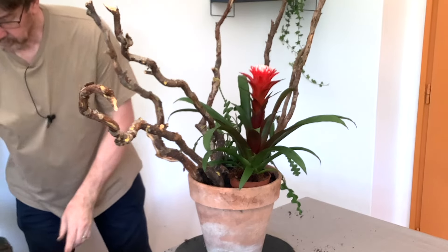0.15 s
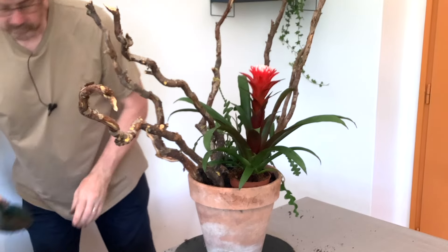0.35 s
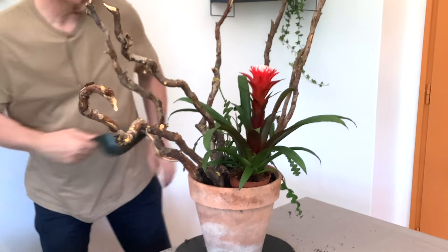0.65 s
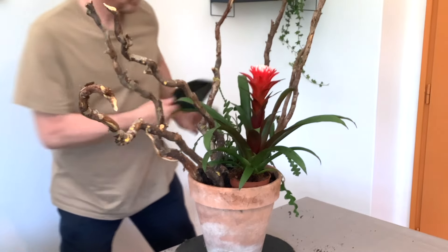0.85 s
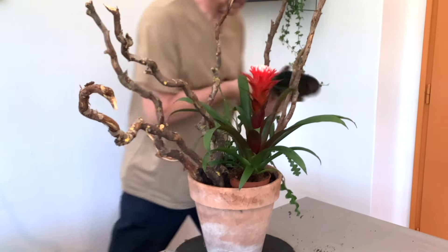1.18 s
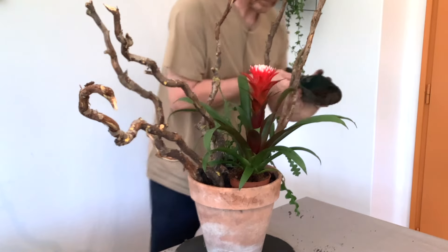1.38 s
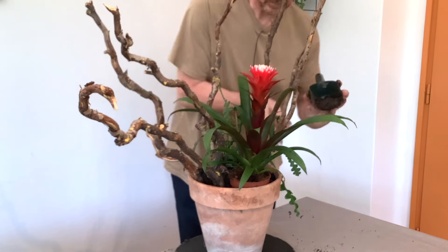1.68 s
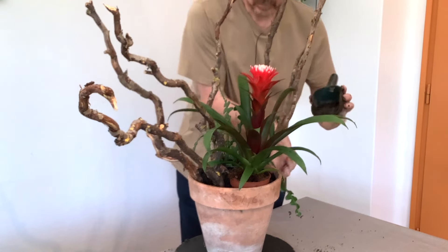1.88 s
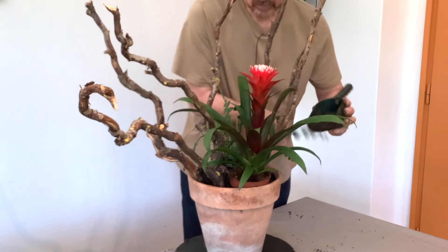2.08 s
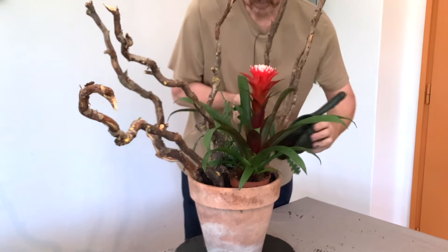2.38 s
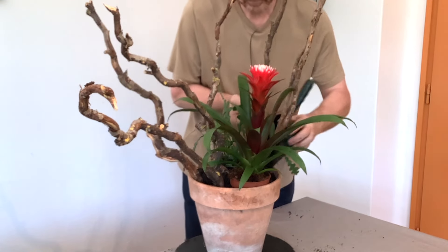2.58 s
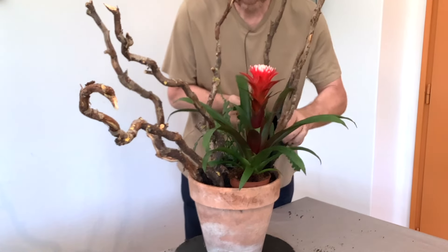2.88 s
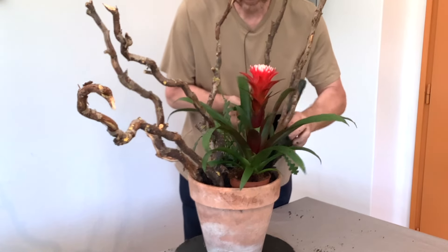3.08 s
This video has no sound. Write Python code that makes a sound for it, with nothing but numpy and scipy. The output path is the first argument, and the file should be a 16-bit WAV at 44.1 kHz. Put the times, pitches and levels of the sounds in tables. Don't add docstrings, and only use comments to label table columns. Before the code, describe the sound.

A plastic scoop knocks twice on a clay pot and soil patters in, after faint tub hum, crumb ticks, cloth rustle and twig snaps; small bare room, close clothing-worn microphone.

```python
import sys
import numpy as np
from scipy import signal
from scipy.io import wavfile
from scipy.ndimage import uniform_filter1d

SR = 44100
rng = np.random.default_rng(int(sys.argv[2]) if len(sys.argv) > 2 else 0)


def ratio(d):
    e = np.asarray(d, float) / 20
    return 10 ** e


def transcribe(signal):
    frames = np.atleast_2d(signal).T
    limited = np.clip(frames, -1, 1)
    pcm = np.round(limited * 32767).astype(np.int16)
    wavfile.write(sys.argv[1], SR, pcm)


N = 143325


def evened(x):
    return x / np.sqrt(np.mean(x ** 2) + 1e-20)


def read(points, hz):
    f, value = np.transpose(points)
    return np.interp(np.log(hz + 1), np.log(f + 1), value)


def add(mix, s, sound):
    part = mix[round(s * SR):][:len(sound)]
    part += sound[:len(part)]


def resonate(x, hz, width):
    r = np.exp(-np.pi * width / SR)
    return signal.lfilter([1 - r, 0, -(1 - r) * r], [1, -2 * r * np.cos(2 * np.pi * hz / SR), r * r], x)


def field(db, size, patchy_db, flicker_db):
    frames = 4 * N // size + 5
    hz = np.fft.rfftfreq(size, 1 / SR)[:, None]
    s = np.arange(frames) * size / 4 / SR
    real, imag, patches = rng.standard_normal((frames, len(hz), 3)).T
    patches = uniform_filter1d(patches, size // 64, 0)
    patches = evened(uniform_filter1d(patches, 4096 // size, 1))
    flicker = evened(uniform_filter1d(rng.standard_normal(frames), 3))
    z = (real + 1j * imag) * ratio(db(hz, s) + patchy_db * patches + flicker_db * flicker)
    return evened(signal.istft(z, nperseg=size, noverlap=3 * size // 4)[1][:N])


def wavelet(db, hz, cycles, grit=0):
    u = np.arange(0, (30 + 2 * cycles) / hz, 1 / SR) * hz
    soft_start = 1 - np.exp(-(u / (.15 + .25 * cycles)) ** 2)
    struck = np.sin(2 * np.pi * u) * soft_start * np.exp(-(u / cycles) ** 1.5)
    rattle = evened(resonate(rng.standard_normal(len(u)), hz, 0.82 * hz))
    rattle = rattle * np.minimum(u, 1) * np.exp(-u / 6)
    return ratio(db) * (struck / abs(struck).max() + grit * rattle)


# (pitch [Hz], t60 [s])
BODY = [(350, .02), (500, .015), (644, .03), (790, .025), (1005, .03), (1090, .02), (1335, .012),
        (2600, .008), (3700, .009), (4750, .007), (5500, .004)]


def ring(drive, strength_db):
    t = np.arange(12000) / SR
    body = np.zeros(len(t))
    for (hz, t60), db in zip(BODY, strength_db):
        body += ratio(db - 60 * t / t60) * np.sin(2 * np.pi * hz * t)
    return signal.oaconvolve(drive, body / np.linalg.norm(body))[:len(drive)]


BODY_DB = [-10, -14, -6, -9, -3.5, -7, -2.5, -1, -2, 2.5, 4]
# (time [s], push [dB], push pitch [Hz], rattle [dB], thud [dB])
BLOWS = [
    (2.6153, -35, 1300, -47, -34),
    (2.62, -38, 1290, -46, -44),
    (2.7956, -19.5, 886, -42.5, -35),
    (2.8046, -31, 1090, -37.5, -50),
]


def blows():
    track = np.zeros(N)
    t = np.arange(20000) / SR
    rattle_t60, thud_t60, thud_hz, spray_db = 0.055, .25, 80.8, -6
    for s, push_db, hz, rattle_db, thud_db in BLOWS:
        shake = rng.standard_normal(len(t)) * ratio(-60 * t / rattle_t60)
        spray = ratio(spray_db) * resonate(shake, 5100, 6700)
        hit = ratio(rattle_db) * 3 * (ring(shake, BODY_DB) + spray)
        swell = 1 - np.exp(-(t / .012) ** 2)
        hit += ratio(thud_db - 60 * t / thud_t60) * swell * np.sin(2 * np.pi * thud_hz * t)
        add(hit, 0, wavelet(push_db, hz, 0.87))
        add(track, s, hit)
    return track


SOIL_DB = [-5, -8, 1, 1, -3, -12, -11, -5, -10, -11, -8]
# (start [s], level [dB], t60 [s])
SLIDES = [
    (2.63, -57, 0.99),
    (2.808, -49, 0.55),
]


def soil():
    t = np.arange(N) / SR
    crumbs_per_s, spread_db, fizz_per_s, fizz_db = 250, 6, 45, -5
    size = ratio(spread_db * np.minimum(rng.exponential(1, N), 4)) * rng.choice([-1, 1], N)
    draw = rng.random(N)
    crumbs = size * (draw < crumbs_per_s / SR)
    fine = size * (1 - draw < fizz_per_s / SR)
    flow = np.zeros(N)
    for s, db, t60 in SLIDES:
        flow += ratio(db - 60 * np.maximum(t - s, 0) / t60) * np.clip((t - s) / 0.015, 0, 1)
    puffs = rng.standard_normal(N) * signal.lfilter([1], [1, -.99], abs(fine))
    fizz = ratio(fizz_db) * evened(resonate(puffs, 7700, 9700))
    hiss = evened(resonate(rng.standard_normal(N), 2100, 4200))
    return flow * (evened(ring(crumbs, SOIL_DB)) + hiss + fizz)


# (time [s], peak [dB], pitch [Hz], length [cycles])
KNOCKS = [(.159, -46.5, 800, 1.2), (.171, -44, 970, 3.1), (.18, -40, 500, 0.57), (0.2185, -43, 970, 1.8),
          (0.235, -44, 1040, 2.8), (.298, -47.5, 1200, 1.2), (.719, -51, 1030, 1),
          (2.103, -47.5, 594, 0.84), (1.244, -40.5, 960, 3.5), (1.252, -34.5, 460, 1.2),
          (1.6762, -30.5, 1060, 0.54), (1.6755, -37.5, 378, 1.26), (1.575, -43, 306, 1.36),
          (1.7102, -35, 1180, 0.55), (2.6295, -31, 1190, 2.2), (2.639, -36, 1000, 2.6),
          (2.623, -28.5, 1160, 2.6), (2.812, -36, 644, 11.4), (2.803, -28, 1040, 5),
          (2.845, -42.5, 780, 10), (2.7955, -28, 358, 1.47), (2.822, -35, 750, 3.5),
          (2.6162, -26.5, 347, 0.92), (2.886, -40, 600, 2), (2.906, -39, 690, 2.3), (3.237, -46, 470, 1),
          (2.52, -41.5, 1130, 0.74), (2.859, -33, 417, 1.5)]


def knocks():
    track = np.zeros(N)
    for s, db, hz, cycles in KNOCKS:
        add(track, s, -wavelet(db, hz, cycles, grit=.1))
    return track


# (time [s], peak [dB], pitch [Hz], length [cycles])
TICKS = [(0.1717, -39.5, 7900, 2), (.187, -50, 7000, 1.5), (.192, -51, 3300, 2), (.2145, -50, 4500, 1.3),
         (.2205, -52, 10000, 1), (.228, -47, 5800, 1.8), (0.812, -46.5, 4500, 0.65), (1.047, -41, 3000, 1),
         (2.079, -54.5, 4300, 2), (2.092, -52, 4030, 2), (2.122, -51, 4000, .7), (2.3485, -48, 2500, 0.44),
         (2.372, -51.5, 3030, 2.2), (2.379, -51.5, 1500, 0.67), (2.756, -39.5, 9000, 1.5),
         (2.776, -44, 2220, 2.7), (2.628, -39, 4640, 3.6), (2.634, -37, 4730, 4.4),
         (2.8045, -29, 3700, 4.4), (2.812, -36, 2570, 6.5), (2.818, -35, 3820, 3), (2.876, -39.5, 4500, 4),
         (2.892, -41, 2900, 3), (2.908, -42, 8000, 1), (3.173, -53, 3500, 1), (3.211, -56, 2850, 3),
         (.237, -46.5, 3300, 4.1), (.247, -51, 2200, 2.1), (1.448, -29, 5970, 3.9),
         (1.5404, -23.5, 3670, 2), (1.8318, -41, 6250, 3.7), (1.889, -37.5, 3020, 0.48),
         (1.9633, -26.5, 6270, 3.6), (1.963, -36.5, 3760, 1.4), (2.105, -43, 7000, 0.79),
         (2.3062, -47, 6400, 2.5), (2.839, -35.5, 3700, 6.5), (3.0429, -43.5, 3060, 7),
         (3.042, -36.5, 6040, 0.51), (3.0664, -33.5, 4800, 0.7), (3.1222, -42, 6000, 1.1),
         (3.2373, -41, 1210, 0.43)]


def ticks():
    track = np.zeros(N)
    for s, db, hz, cycles in TICKS:
        add(track, s, wavelet(db, hz, cycles, grit=.25))
    return track


# (start [s], length [s], level [dB], resonance [Hz], width [share of resonance])
SCUFFS = [(0.062, 0.071, -70, 3300, .4), (0.063, 0.055, -70, 7500, 0.72), (0.155, 0.05, -59, 6200, 1.4),
          (0.2, 0.065, -61, 4800, 1.4), (.13, 0.15, -66, 3250, .4), (.26, 0.077, -65.5, 1150, .6),
          (0.49, 0.058, -58.5, 1270, 0.53), (0.87, 0.092, -61.5, 1850, 0.37),
          (0.857, 0.091, -63, 9400, 1.9), (.93, 0.086, -49.5, 1517, 0.12), (.93, 0.09, -47, 6400, 5),
          (.955, .065, -50.5, 5930, 0.25), (1.038, 0.036, -52.5, 2470, 0.37),
          (1.068, 0.053, -50, 2440, 0.5), (1.06, 0.085, -53, 8400, 1.1), (1.15, 0.12, -55, 3360, 0.12),
          (1.294, 0.028, -48, 950, 0.25), (1.358, .2, -50, 1610, 0.82), (1.356, .1, -52, 3200, 0.15),
          (1.4, 0.046, -58, 9100, 1.2), (1.799, 0.13, -63, 1300, 0.21), (2.485, 0.077, -61.5, 3500, 2.3),
          (2.58, 0.067, -53.5, 5500, 2.8), (1.96, .06, -62.5, 6600, .25), (.71, .16, -63, 540, 1.6),
          (3.06, 0.092, -67, 2960, .3), (2.235, 0.033, -64, 3800, 1.1), (2.3, 0.052, -66.5, 3700, 0.34),
          (2.465, 0.022, -70, 4800, 0.56), (1.9, 0.026, -61, 6900, 1.7), (2.495, .045, -60.5, 550, 1.5),
          (.49, 0.052, -71, 8600, 0.49), (2.735, 0.037, -57, 4500, 0.83), (2.92, 0.02, -51.5, 5600, 0.97),
          (2.981, .02, -56.5, 5400, 0.91)]


def scuffs():
    track = np.zeros(N)
    for s, length, db, hz, share in SCUFFS:
        n = round(length * SR)
        grit = evened(uniform_filter1d(rng.standard_normal(9000), 60))[:n]
        rub = rng.standard_normal(n) * np.exp(.5 * grit)
        rub = resonate(resonate(rub, hz, hz * share), hz, 2 * hz * share)
        stroke = np.sin(np.pi * np.arange(n) / n) ** 1.1
        add(track, s, ratio(db) * stroke * evened(rub))
    return track


# (time [s], cloth level [dB], brightness [dB per octave], sway level [dB])
MOTION = [(0, -67.5, -3, -72), (.22, -68, -3, -61.5), (.42, -70, 1, -62), (.7, -69.5, -1, -55.5),
          (.9, -58, -0.5, -48.5), (1.03, -52, 0.5, -53), (1.2, -49.5, 2, -50.5), (1.31, -50.5, 1.5, -53),
          (1.4, -45.5, 1.5, -57), (1.58, -48.5, 2.5, -58), (1.68, -53, 2, -58.5), (1.76, -59.5, 1.5, -54.5),
          (1.98, -58.5, -0.5, -57.5), (2.2, -63.5, 3, -72), (2.45, -68, -1, -66), (2.8, -67.5, 1, -52.5),
          (3.08, -64, 2.5, -65), (3.25, -73, -2, -60)]
# (frequency [Hz], density [dB per Hz])
CLOTH = [(150, 5), (600, 3.5), (1500, 2), (3300, -4.5), (6000, -9), (15800, -22.5)]
# (frequency [Hz], density [dB per Hz])
SWAY = [(15, 0.5), (40, -1), (90, -8), (200, -14), (900, -57)]


def clothes():
    s, level, tilt, sway = np.transpose(MOTION)
    t = np.arange(N) / SR

    def hiss_db(hz, u):
        return read(CLOTH, hz) + np.interp(u, s, tilt) * np.log2((hz + 50) / 2500)

    rub = field(hiss_db, size=256, patchy_db=2.0, flicker_db=0.5)
    low = field(lambda hz, u: read(SWAY, hz) + 0 * u, size=1024, patchy_db=1.0, flicker_db=5.0)
    nap = rng.standard_normal(N) * (rng.random(N) < 400 / SR)
    snags = evened(signal.lfilter([1], [1, -.98], abs(nap)))
    rub = evened(rub * (1 + .5 * snags))
    return rub * ratio(np.interp(t, s, level)) + low * ratio(np.interp(t, s, sway))


# (time [s], peak [dB], pitch [Hz], length [cycles])
BUMPS = [(0.286, -51, 61, 2), (0.492, -49, 123, 1.9), (1.151, -48.5, 152, 1.2), (1.167, -39, 134, 0.79),
         (1.378, -49, 99, 0.72), (1.552, -51, 61, 1), (1.834, -42, 152, 0.48), (1.896, -36, 79, 0.72),
         (3.209, -48.5, 41.7, 1.1), (1.3653, -38.5, 330, 0.52), (1.439, -41.5, 400, 0.79),
         (1.4509, -31, 430, 1.47), (1.878, -41, 450, 0.51), (1.888, -38, 490, 0.46), (2.51, -49, 70, 1.3),
         (1.255, -44, 181, 0.91)]


def bumps():
    track = np.zeros(N)
    for s, db, hz, cycles in BUMPS:
        add(track, s, -wavelet(db, hz, cycles))
    return track


def tub():
    t = np.arange(N) / SR
    hz, db, t60, stop_s = 275, -55.5, 1.2, 0.15
    beat = np.sin(2 * np.pi * hz * t) + .3 * np.sin(2 * np.pi * 1.08 * hz * t + 1)
    hand_db = 720 * np.maximum(t - stop_s, 0)
    return ratio(db - 60 * t / t60 - hand_db) * np.sqrt(2) * beat


# (frequency [Hz], t60 [s])
ROOM = [(100, 0.49), (1000, 0.67), (6000, 0.37), (15000, 0.35)]


def room(x):
    taps = np.zeros(SR)
    at = np.arange(260, SR - 20, 20)
    taps[at + rng.integers(0, 20, len(at))] = rng.choice([-1., 1.], len(at))
    hz, t, z = signal.stft(taps, SR, nperseg=256)
    decay = ratio(-60 * t / read(ROOM, hz)[:, None])
    tail = signal.istft(z * decay, SR, nperseg=256)[1]
    return signal.fftconvolve(x, tail / np.linalg.norm(tail))[:N]


# (frequency [Hz], density [dB per Hz])
FLOOR = [(12, -33), (20, 0), (181, -8), (1150, -21), (1650, -30.5), (3310, -26), (15800, -36.5)]


def hush():
    return ratio(-63) * field(lambda hz, u: read(FLOOR, hz) + 0 * u, size=2048, patchy_db=2.15, flicker_db=0.8)


def scene():
    crumb_ticks = ticks()
    tick_share = .55
    air = soil() + blows() + knocks() + scuffs() + tick_share * crumb_ticks
    touch = clothes() + bumps() + tub() + (1 - tick_share) * crumb_ticks
    wet_db = -8.5
    return (air + ratio(wet_db) * room(air) + touch + hush())[None]


def band_limit(x):
    return signal.sosfilt(signal.butter(12, 16500, fs=SR, output="sos"), x)


def record(dry):
    low_pass = signal.firwin(255, 15900, fs=SR)
    mix = signal.oaconvolve(dry, low_pass[None], "same")
    return band_limit(mix)


dry = scene()
out = record(dry)
transcribe(out)
```